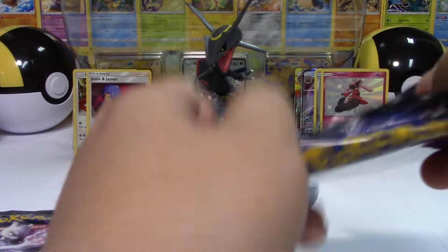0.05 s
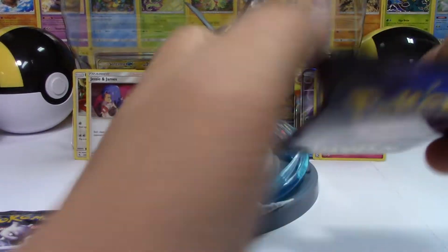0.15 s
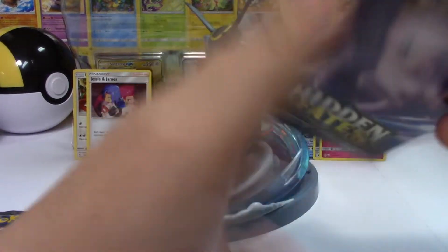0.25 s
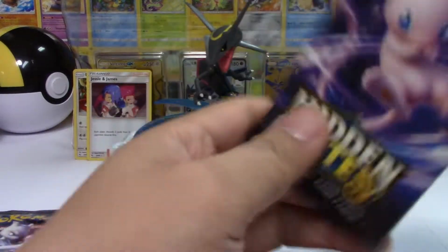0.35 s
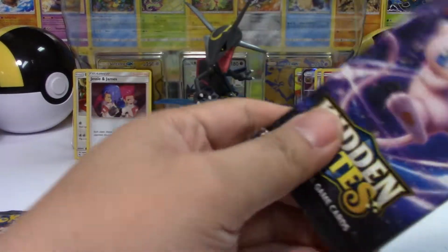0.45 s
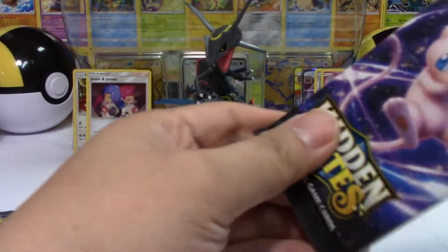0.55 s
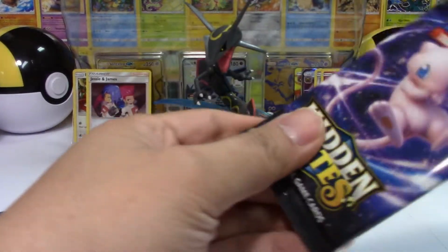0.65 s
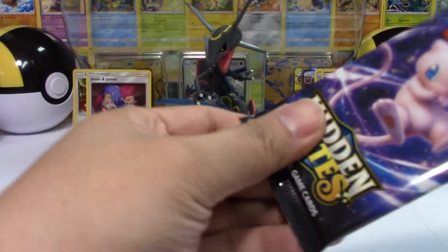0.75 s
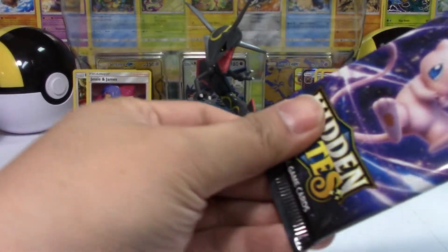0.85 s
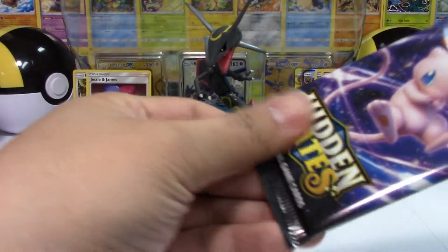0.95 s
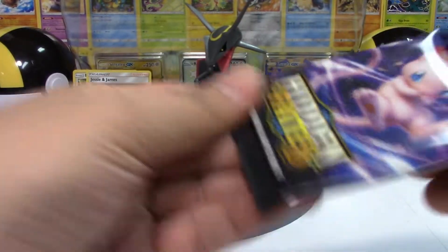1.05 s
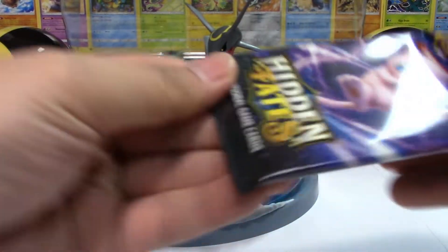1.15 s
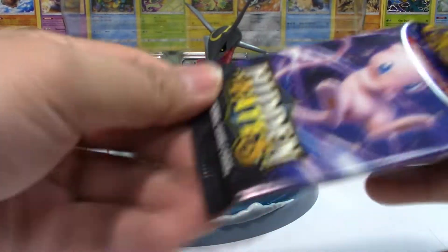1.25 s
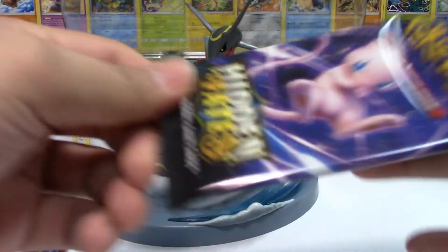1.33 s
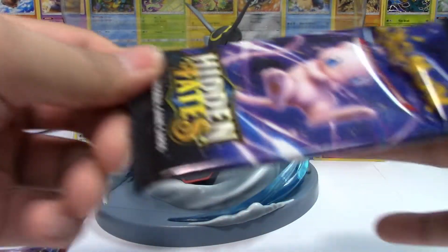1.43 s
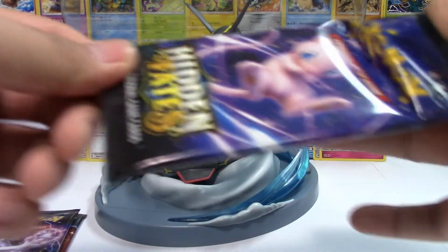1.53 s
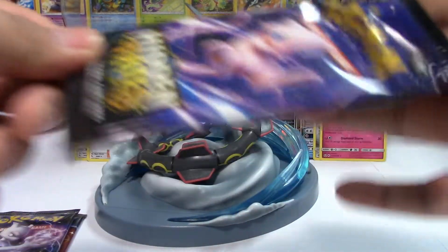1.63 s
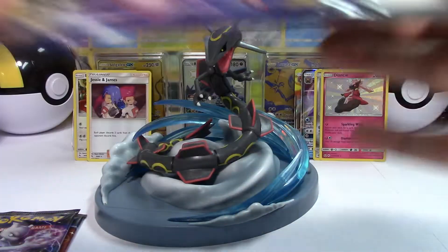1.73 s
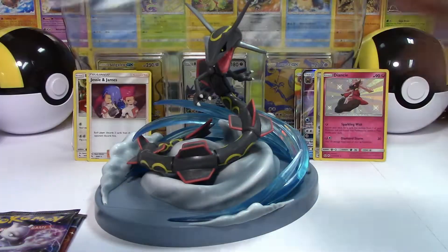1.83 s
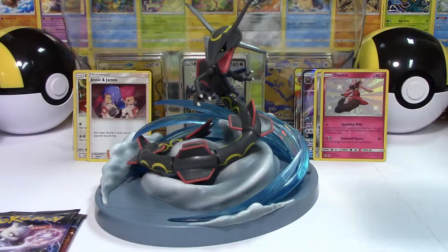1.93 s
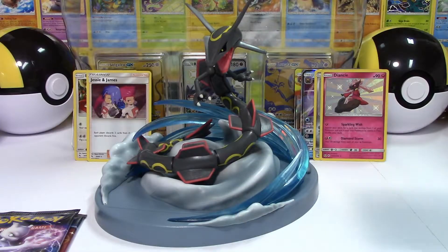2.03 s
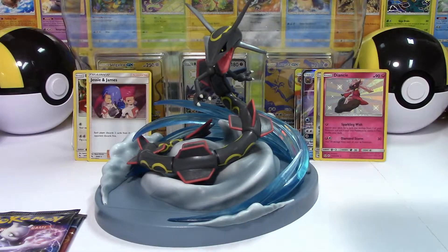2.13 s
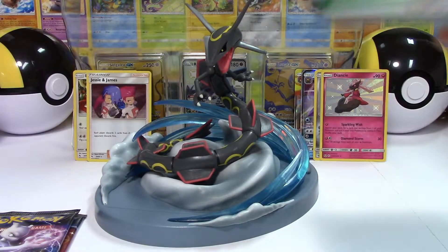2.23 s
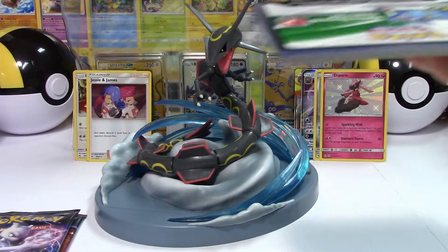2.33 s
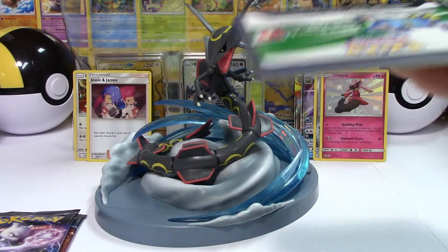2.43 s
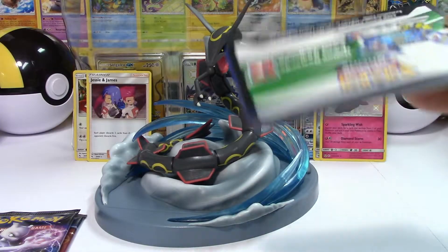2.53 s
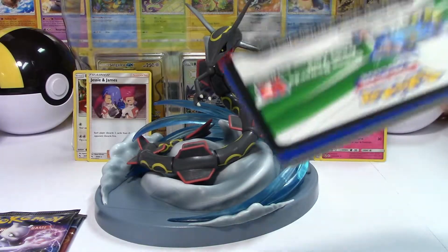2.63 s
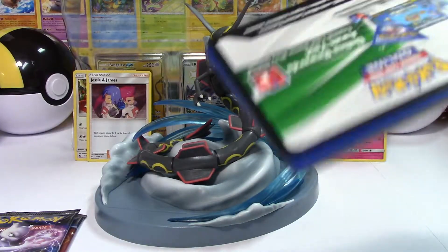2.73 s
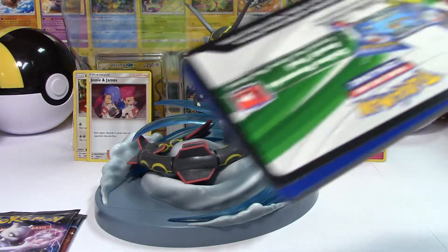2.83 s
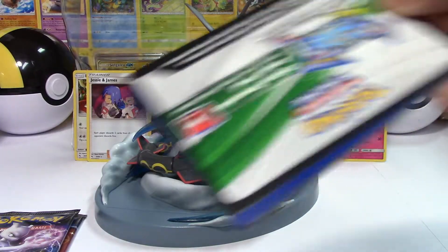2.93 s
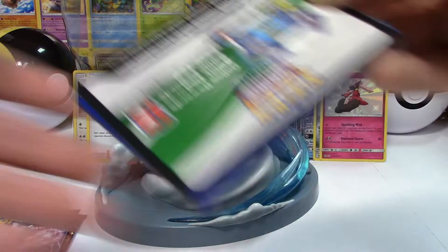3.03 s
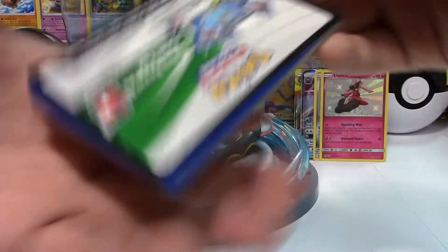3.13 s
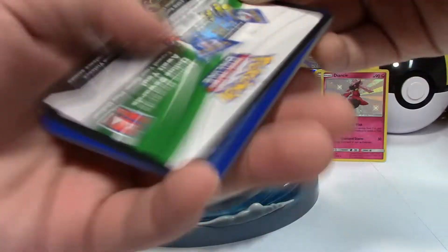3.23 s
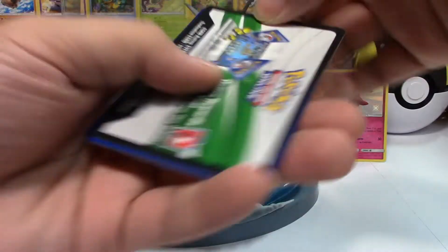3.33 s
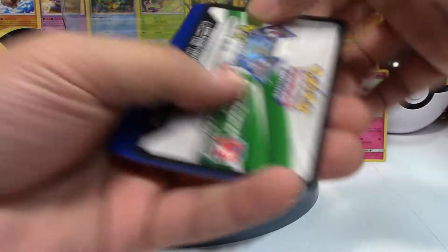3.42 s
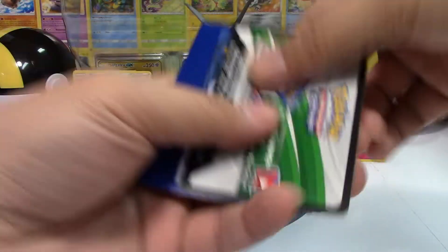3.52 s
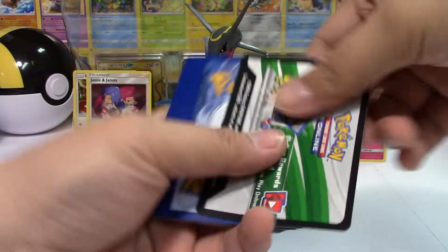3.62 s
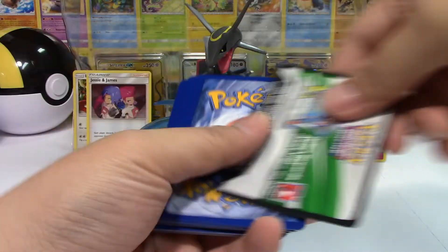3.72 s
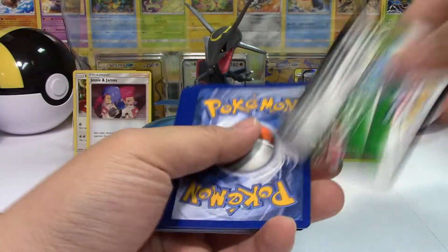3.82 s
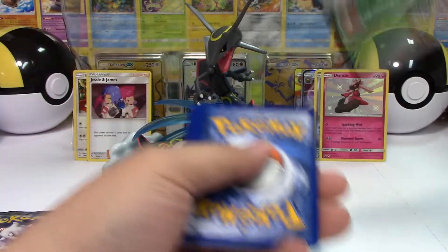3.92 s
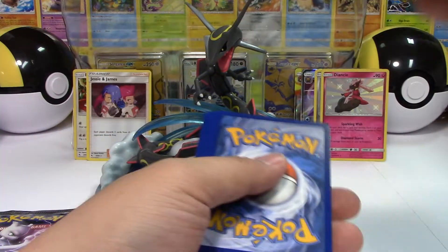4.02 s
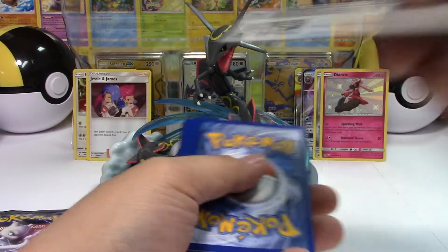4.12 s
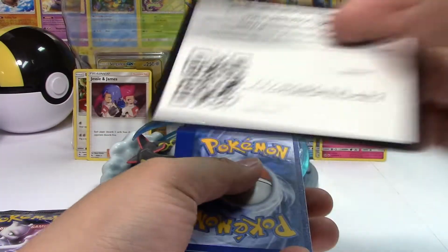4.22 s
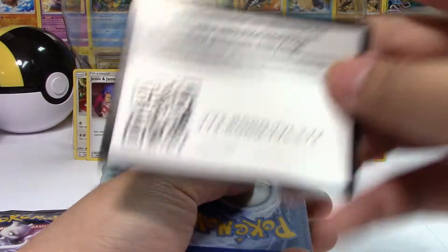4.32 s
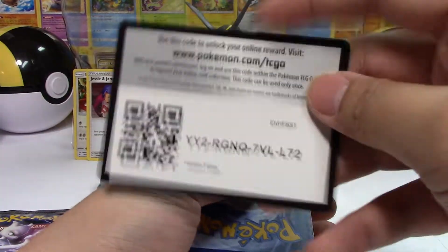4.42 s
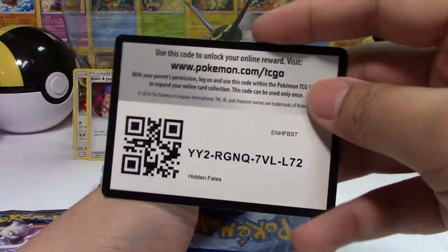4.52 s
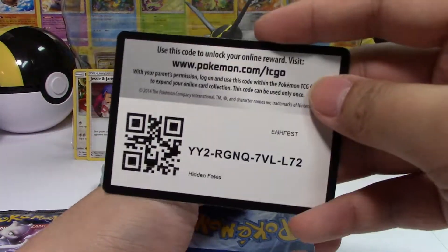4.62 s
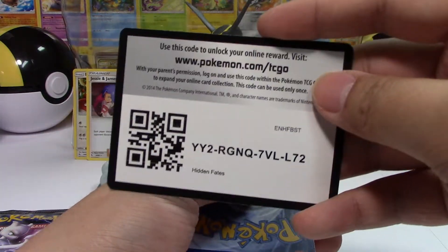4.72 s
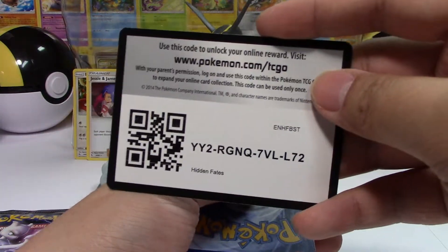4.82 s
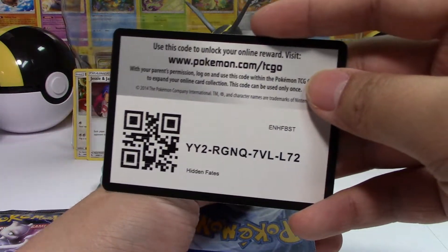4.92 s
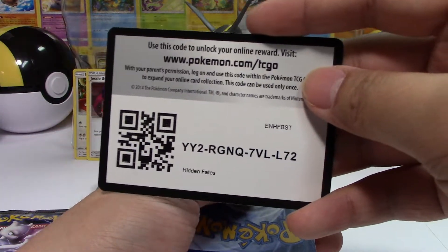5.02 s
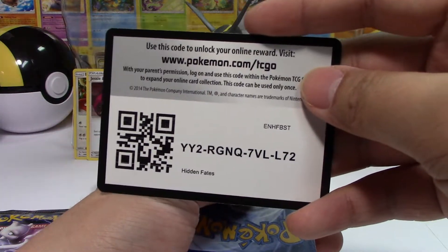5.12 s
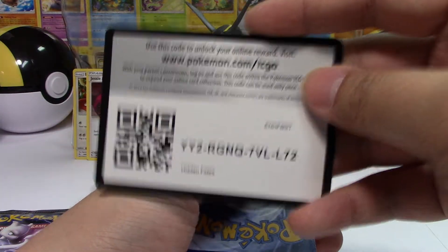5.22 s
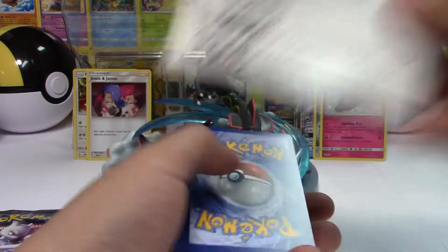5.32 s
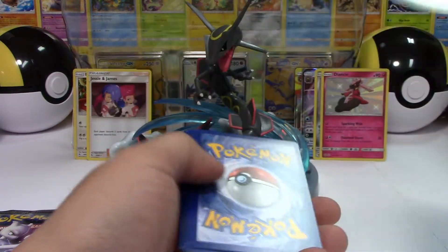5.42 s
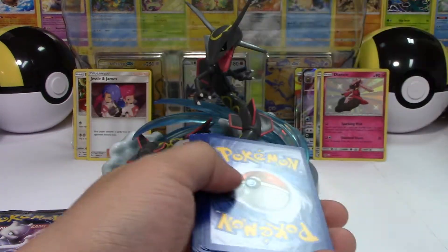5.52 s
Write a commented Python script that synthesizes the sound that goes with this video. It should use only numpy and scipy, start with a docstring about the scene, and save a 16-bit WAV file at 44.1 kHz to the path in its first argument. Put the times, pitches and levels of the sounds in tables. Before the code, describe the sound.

Close stereo sound of hands opening a foil packet of cards at a table in a small, quiet room. From 0 to 0.6 s the foil is squeezed in loud, dense bursts of bright crackle and hard snaps, with a few dull low bumps around 0.2 to 0.35 s. It eases, with a soft bump near 0.7 s, then sparser creases snap from 0.95 to 1.5 s. Around 1.55 to 1.85 s the film is dragged off in a short, dense, bright rush peaking near 1.65 s. Then it turns quiet: faint ticks, and soft card rubs from 2.3 s. Sliding grows around 3.2 to 3.8 s; a sharp flick with a small knock lands at 3.93 s, with more quick scrapes and ticks to 4.4 s. Nearly still until a slide, crisp flick and card tap at 5.34 s, and a lighter tick at 5.42 s. Low, steady room noise lies underneath.

```python
"""Opening a foil card pack

Hands tear open a foil pack: noise bursts ring as snapping creases, and noise with random slips makes the rustle.
A bright rush of noise is the film coming off; then cards rub (more slips), flick (ringing clicks) and tap.
Fading sine tones make the bumps, knocks and taps of the fingers and the stack.
A table top adds a weak echo, a small room answers softly, and low steady noise lies underneath."""
import sys
import numpy as np
from scipy import signal
from scipy.fft import rfft, irfft, next_fast_len
from scipy.io import wavfile
from scipy.ndimage import uniform_filter1d, map_coordinates

SR = 44100
rng = np.random.default_rng(int(sys.argv[2]) if len(sys.argv) > 2 else 0)


def pcm_store(signal):
    """Save signal as 16-bit PCM."""
    levels = np.round(np.clip(np.atleast_2d(signal), -1, 1) * 32767)
    wavfile.write(sys.argv[1], SR, levels.astype(np.int16).T)


N = 245056  # length [samples]


def amp(db):
    """Turn decibels into a gain."""
    return 10 ** (np.asarray(db) / 20)


def unit(x):
    """Scale to an rms of 1."""
    return x / np.sqrt(np.mean(x ** 2) + 1e-20)


def along(points, hz):
    """Read a curve of (frequency, value) points, with frequency on a log axis."""
    f, value = np.transpose(points)
    return np.interp(np.log(hz + 1), np.log(f + 1), value)


def filtered(x, response):
    """Multiply the spectrum of x by a response, given as a function of frequency in Hz."""
    n = x.shape[-1]
    padded = next_fast_len(n + 4096)
    spectrum = rfft(x, padded) * response(np.fft.rfftfreq(padded, 1 / SR))
    return irfft(spectrum, padded)[..., :n]


def resonance(f, hz, q):
    """Response of one damped vibration; a higher q rings longer."""
    return 1j * f * hz / q / (hz * hz - f * f + 1j * f * hz / q)


def wobble(rate):
    """A smooth random curve through `rate` random points a second."""
    points = rng.standard_normal(int(N * rate / SR) + 4)
    return map_coordinates(points, [np.arange(N) * rate / SR])


def add(track, s, sound):
    """Mix a sound into the track at time s."""
    part = track[max(0, round(s * SR)):][:len(sound)]
    part += sound[:len(part)]


def swell(start, hold, rise, fall):
    """Level in dB of a movement: up 20 dB in rise seconds, held, down 20 dB in fall seconds."""
    t = np.arange(N) / SR
    before = np.maximum(start - t, 0) / (abs(rise) + 1e-6)
    after = np.maximum(t - start - hold, 0) / (abs(fall) + 1e-6)
    return -20 * (before + after)


def together(movements):
    """Add the power of movements (level over time, body, treble, all dB); return the same three controls."""
    def total(levels):
        return 10 * np.log10(sum(amp(db) ** 2 for db in levels) + 1e-20)

    level = total(db for db, body, treble in movements)
    body_level = total(db + body for db, body, treble in movements)
    treble_level = total(db + treble for db, body, treble in movements)
    return level, body_level - level, treble_level - level


def sized(x):
    """Give a short sound the same energy as 1 ms at an rms of 1."""
    return x / np.sqrt(np.sum(x ** 2) / (SR / 1000))


def clicks(rows, life, q, hiss_hz, hiss_q, flutter_db, flutter_t60):
    """Each sudden release rings a small patch of sheet and jolts the body behind it; the rest flutters on.

    Rows: (time [s], relative level [dB], ring [Hz], treble [dB], body [dB])."""
    low_body_hz, high_body_hz, body_q = 587, 960, 2.9  # the filled pack and the bare stack share these
    out, t = np.zeros(N), np.arange(SR // 16) / SR

    def body_response(f):
        return resonance(f, low_body_hz, body_q) + amp(-2.0) * resonance(f, high_body_hz, 2 * body_q)

    for s, db, hz, treble_db, body_db in rows:
        release, flutter = rng.standard_normal((2, len(t)))
        push = release * np.exp(-t / life) + flutter * amp(flutter_db - 60 * t / flutter_t60)
        ring = sized(filtered(push, lambda f: resonance(f, hz, q) * resonance(f, hz, 0.18)))
        hiss = sized(filtered(push, lambda f: resonance(f, hiss_hz, hiss_q) ** 2))
        body = sized(filtered(push, body_response))
        mix = ring + amp(treble_db) * hiss + amp(body_db) * body
        add(out, s, amp(db) * sized(mix))
    return out


def softened(x, corner_hz):
    """Round off the top of each click above a corner frequency."""
    return filtered(x, lambda f: 1 / (1 + (f / corner_hz) ** 6))


def small_creases(grip_db, count=1200):
    """Small releases come at random, more often (up to a limit) and louder when the level is high."""
    full_rate, full_grip_db = 130, -43  # releases a second at or above this level
    level_db, spread_db = 5.5, 3.5  # above the level given, and random scatter
    middle_hz, spread_octaves = 2890, 0.84
    treble_db, body_db = -5, -12
    moment, chance = rng.random((count, 2)).T
    size, pitch = rng.standard_normal((count, 2)).T
    db = grip_db[(moment * N).astype(int)]
    rate = full_rate * np.minimum(amp(db - full_grip_db), 1)
    happens = chance * count * SR / N < rate
    level = db + level_db + spread_db * size
    hz = middle_hz * 2 ** (spread_octaves * pitch)
    rows = np.transpose([moment * N / SR, level, hz, np.full(count, treble_db)])
    return [(*row, body_db) for row in rows[happens]]


def rubbing(controls, spectrum, rate, spread_db, uneven_db, uneven_rate):
    """Countless tiny slips of uneven size, plus noise, excite a sheet; its body and treble are set apart."""
    body_below_hz, treble_above_hz = 1600, 6680
    db, body_db, treble_db = controls
    sizes = amp(spread_db * np.minimum(rng.standard_exponential(N), 3))
    slips = (rng.random(N) < rate / SR) * sizes * np.sign(rng.standard_normal(N))
    drive = (unit(slips) + rng.standard_normal(N)) * amp(uneven_db * wobble(uneven_rate))
    sheet = filtered(drive, lambda f: amp(along(spectrum, f)))

    def below(f, hz):
        return 1 / (1 + (f / hz) ** 8)

    body = unit(filtered(sheet, lambda f: below(f, body_below_hz)))
    middle = unit(filtered(sheet, lambda f: below(f, treble_above_hz) - below(f, body_below_hz)))
    treble = unit(filtered(sheet, lambda f: 1 - below(f, treble_above_hz)))
    return amp(db) * (amp(body_db) * body + middle + amp(treble_db) * treble)


def flexing(x, depth_db):
    """A bending sheet keeps shifting its resonances: a random gain drifts over time and frequency."""
    z = signal.stft(x, nperseg=256)[2]
    field = uniform_filter1d(rng.standard_normal(z.shape), size=3, axis=0)  # smooth over frequency
    field = uniform_filter1d(field, size=10, axis=1)  # smooth over time
    gain = unit(amp(depth_db * unit(field)))
    return signal.istft(z * gain, nperseg=256)[1][:N]


def crumpling():
    """The wrapper is held and squeezed again and again, each squeeze swelling and dying away."""
    attack_s, release_s = 0.015, 0.029  # time for 20 dB
    # squeezes: (start [s], end [s], relative level [dB], body [dB], treble [dB])
    squeezes = [(0.0, .108, -34.5, -1, -8.5), (.043, .1, -28.5, -5, -11.5), (.245, .268, -24.5, -1, -15),
                (.31, .342, -29.5, -0.5, -4), (.35, .46, -38.5, -3, -2), (.408, .465, -31, -12, -13),
                (.565, .6, -33, -5, -2), (.67, .69, -39.5, -2.5, -5), (.715, .745, -38, 1, -5),
                (.785, .806, -39.5, -4, -7), (.81, .88, -52.5, -16, 4.5), (.882, .955, -38, -5.5, -7),
                (1.0, 1.068, -38, -4, -4.5), (1.2, 1.255, -39.5, -7.5, -5), (1.265, 1.312, -39, -2, -10),
                (1.47, 1.545, -45, -5.5, -6), (1.56, 1.603, -35, 0, -1.5), (1.775, 1.8, -38, 0.5, -9),
                (1.86, 1.876, -43.5, 3.5, -34)]
    # the pack shifting in the fingers meanwhile: (start [s], end [s])
    held_span = (0.0, 1.33)
    # how that shifting sounds: (relative level [dB], body [dB], treble [dB])
    held_sound = (-50, -4, -6.5)
    movements = []
    for start, end, db, body, treble in [*squeezes, (*held_span, *held_sound)]:
        level = db + swell(start, end - start, attack_s, release_s)
        movements.append((level, body, treble))
    return together(movements)


def dragging():
    """Level in dB of the pull that drags the wrapper off, silent outside it."""
    # the pull: (time [s], level [dB])
    pull_levels = [(1.56, -57), (1.615, -31), (1.628, -26.5), (1.645, -20.5), (1.657, -26), (1.70, -32.5),
                   (1.745, -33), (1.777, -28), (1.85, -59)]
    s, db = np.transpose(pull_levels)
    return np.interp(np.arange(N) / SR, s, db, left=-np.inf, right=-np.inf)


def foil():
    """Creases snap and crackle as they buckle, over a crinkle that follows the grip; the pull crackles too."""
    # loud creases buckling: (time [s], relative level [dB], ring [Hz], treble [dB], body [dB])
    creases = [(.0429, -11.5, 1650, -18, -8), (.0505, -10, 1600, -14, 1.5), (.07, -6.5, 2900, -22, -1),
               (0.083, -5, 1950, -4, -11), (.119, -17, 6000, 0, -12), (0.144, -13.5, 3900, 3, -2.5),
               (0.2001, -19, 2700, -9.5, -5.5), (.2428, -14.5, 2530, -7, -21),
               (0.259, -13, 3590, -10.5, -6), (.273, -4.5, 3800, -8, -8.5), (.339, -15.5, 3400, -3.5, -2),
               (.4088, -2.5, 4300, -1, -18), (0.4191, -1, 2200, -10, -13.5), (0.4525, -13.5, 2900, -6, -13),
               (0.4598, -15.5, 3500, -16.5, -13.5), (.4638, -9.5, 5500, -3.5, -8.5),
               (.4679, -18.5, 4300, -5, -4), (0.5307, -17.5, 2700, -21, -13.5), (.5625, -2, 2900, 2, -11),
               (0.5806, -11.5, 2300, -18, -15.5), (.597, -8, 3650, -24, -7.5),
               (0.9469, -1.5, 2150, -17, -17), (0.9977, -14, 7600, -4.5, -15),
               (1.009, -10.5, 3500, -17.5, -8.5), (1.015, -17.5, 5000, -23.5, -6),
               (1.0368, -6, 5000, -30, -17.5), (1.0608, -7, 6500, 1.5, -23), (1.0682, -15, 4500, -2.5, -25),
               (1.1065, -21.5, 2500, -21.5, -17.5), (1.1989, -3, 2600, -5.5, -18.5),
               (1.2094, -16, 4300, 0.5, -1.5), (1.2213, -8.5, 6300, 1.5, -22),
               (1.228, -12.5, 5200, -17.5, -6), (1.233, -15.5, 5500, -4, -16), (1.238, -8, 3300, 8.5, -19),
               (1.2767, -13, 1810, -6.5, -3), (1.3092, -3.5, 4750, -31.5, -9.5),
               (1.3435, -20.5, 2900, -11, -10), (1.3584, -16.5, 3180, -13.5, -9.5),
               (1.4378, -13.5, 3000, -7.5, -7), (1.45, -6, 2600, -16, -17.5),
               (1.4573, -15, 2200, -25, -3.5), (1.465, -15, 2800, 1.5, -13),
               (1.4868, -16, 4000, -10, -11.5), (1.5268, -15, 1600, -22, -10), (1.534, -13.5, 3600, -2, -5),
               (1.5502, 0.5, 4270, -11, -15.5), (1.5667, -14, 2320, -13, -17),
               (1.5781, -7.5, 2800, -6, -14.5), (1.6074, -3, 3200, -31.5, -10.5),
               (1.6435, -4, 4000, -11.5, -9), (1.731, -11, 2700, -7, -1), (1.8013, -9, 3700, -10, -8)]
    # tone of the crinkling foil: (frequency [Hz], relative level [dB])
    foil_tone = [(25, -41), (80, -8.5), (136, -6), (237, 4.5), (386, 1), (629, 2), (768, -13), (917, 1.5),
                 (1200, -9), (1560, 3), (4620, -2), (9820, 3), (15000, -13)]

    def snap(rows):
        sharp = clicks(rows, life=0.00044, q=2.84, hiss_hz=7040, hiss_q=0.66,
                       flutter_db=-10.5, flutter_t60=0.012)
        return softened(sharp, corner_hz=12000)

    grip = crumpling()
    crinkle = rubbing(grip, foil_tone, rate=3800, spread_db=4.0, uneven_db=2.0, uneven_rate=150)
    crackle_level = np.maximum(grip[0], dragging() - 4)  # the pull crackles 4 dB less than a squeeze
    crackle = snap(small_creases(crackle_level))
    return amp(-6.5) * snap(creases) + amp(-2.5) * flexing(crinkle, depth_db=2.5) + crackle


def fingers():
    """Bumps set the stack swinging, knocks and taps ring the stack or one card: tones that start sharp and fade."""
    # fingers bumping pack and stack: (time [s], relative level [dB], pitch [Hz])
    bumps = [(.219, -13, 246), (.305, -18, 260), (.339, -22.5, 228), (0.7273, -14, 223),
             (4.076, -22.5, 247), (4.226, -23, 221), (4.3011, -22, 201.4)]
    # swing of the hand-held stack: (pitch ratio [1], relative level [dB], time to fall 60 dB [s])
    hand_modes = [(1, 2, 0.024), (0.675, -13, 0.09)]
    # the edge of the stack being knocked: (time [s], relative level [dB])
    knocks = [(.318, -20), (.338, -19), (1.309, -27), (3.9313, -14.5), (4.07, -21.5)]
    # vibrations of the stack: (frequency [Hz], relative level [dB], time to fall 60 dB [s])
    stack_modes = [(130, -15.5, 0.074), (293, -17.5, 0.16), (447, -8.5, 0.047), (570, 2, 0.033),
                   (653, -9.5, 0.046), (1560, -9.5, 0.03)]
    # a single card tapped on the stack: (time [s], relative level [dB])
    card_taps = [(4.224, -36), (5.3366, -27.5), (5.4195, -40.5)]
    # vibrations of a single card: (frequency [Hz], relative level [dB], time to fall 60 dB [s])
    card_modes = [(591, -1, 0.052), (1500, 6, 0.026), (1720, 4, 0.04), (3760, 5.5, 0.024)]
    radiate_hz = 140  # so small a body gives off little sound below this

    swings = [(s, db + mode_db, hz * ratio, t60) for s, db, hz in bumps for ratio, mode_db, t60 in hand_modes]
    rings = [(s, db + mode_db, hz, t60) for s, db in knocks for hz, mode_db, t60 in stack_modes]
    taps = [(s, db + mode_db, hz, t60) for s, db in card_taps for hz, mode_db, t60 in card_modes]
    out, t = np.zeros(N), np.arange(SR // 5) / SR
    sag = 1 + 0.3 * np.exp(-t / 0.00087)  # the grip relaxes and the pitch sags
    onset = 1 - np.exp(-t / 0.0027)
    for s, db, hz, t60 in swings + rings + taps:
        phase = 2 * np.pi * np.cumsum(hz * sag) / SR
        add(out, s, amp(db - 60 * t / t60) * onset * np.sin(phase))
    return filtered(out, lambda f: 1j * f / (radiate_hz + 1j * f)) * amp(4.0)


def pull():
    """The film slides off the cards in one dense, bright rush of noise."""
    # tone of film sliding on card: (frequency [Hz], relative level [dB])
    film_tone = [(29, -50), (80, -20), (607, -7), (1030, -14), (2500, -11), (4560, -1.5), (12500, -11.5),
                 (15500, -25)]
    rush = unit(filtered(rng.standard_normal(N), lambda f: amp(along(film_tone, f))))
    uneven = rush * amp(1.6 * wobble(300))
    return amp(dragging()) * flexing(uneven, depth_db=1.0)


def sliding():
    """Each stroke of a card gathers speed and dies away."""
    # card over card, 20 dB down at both ends:
    # (start [s], fastest moment [s], end [s], relative level [dB], body [dB], treble [dB])
    strokes = [(2.263, 2.359, 2.49, -42, 3, -24), (2.499, 2.503, 2.64, -44.5, -0.5, -15),
               (2.583, 2.606, 2.69, -46, 3.5, -15), (2.77, 2.89, 3.06, -58, 0, -6.5),
               (3.156, 3.155, 3.225, -51, -13, 9.5), (3.215, 3.229, 3.38, -59.5, -17, 9),
               (3.28, 3.38, 3.52, -48.5, -12, -9), (3.434, 3.448, 3.47, -34, -22, -9),
               (3.315, 3.694, 3.81, -46, -4, 3), (3.686, 3.76, 3.808, -43, -1, 3),
               (3.811, 3.839, 3.93, -48, -19, 2), (3.86, 3.913, 3.955, -33.5, -6, -8),
               (4.054, 4.096, 4.113, -30, -2.5, -8.5), (4.092, 4.119, 4.13, -49.5, -3, 10.5),
               (4.195, 4.248, 4.295, -45.5, 4.5, 7), (4.212, 4.269, 4.293, -33.5, -6, -9),
               (4.379, 4.41, 4.62, -51.5, 3, -2.5), (4.452, 4.65, 5.15, -66.5, -3, -9),
               (5.222, 5.33, 5.55, -44.5, -6.5, -5)]
    roundness = 1.2  # above 1 a stroke holds its level, then ends sooner
    movements = []
    for start, peak, end, db, body, treble in strokes:
        straight = swell(peak, 0, peak - start, end - peak)
        rounded = -20 * np.abs(straight / 20) ** roundness
        movements.append((db + rounded, body, treble))
    return together(movements)


def cards():
    """Card stock slides with a fine grain and tiny catches, and flicks with a sharp tick and a short rasp."""
    # card edges catching and letting go: (time [s], relative level [dB], ring [Hz], treble [dB])
    edge_flicks = [(1.859, -20, 2530, -20), (1.8695, -18, 3740, -29), (2.001, -27.5, 1720, -15),
                   (2.128, -37.5, 1300, -16), (2.1534, -30, 2390, -0.5), (2.242, -29, 1760, -12),
                   (2.6, -29.5, 1570, -21), (3.2195, -27.5, 2550, -1), (3.2324, -21.5, 2500, 12),
                   (3.4417, -22.5, 4040, -4), (3.6215, -29.5, 1600, -10), (3.9298, -9.5, 3800, -12),
                   (4.065, -19.5, 2300, -28), (4.0946, -12.5, 5370, -14), (4.135, -30.5, 1470, -2.5),
                   (4.2143, -26, 2897, -15), (4.2228, -23, 1800, -10), (4.2677, -19.5, 1960, -14),
                   (4.2735, -18.5, 3520, 2), (4.291, -30, 1390, -15), (4.3943, -24.5, 1940, -16),
                   (4.645, -41, 2200, -6), (4.707, -45, 2600, -7), (4.884, -47, 2600, -8),
                   (5.3382, -12.5, 3860, -7), (5.4194, -21.5, 1820, -5)]
    # tone of card rubbing on card: (frequency [Hz], relative level [dB])
    card_tone = [(88, -29.5), (150, -14), (264, -1), (376, -5), (589, -7), (854, -14), (1040, -9),
                 (1720, -2), (2200, 4), (4410, 0.5), (7320, 0), (11300, -5), (16000, -16)]

    def tick(rows):
        return clicks(rows, life=0.0011, q=1.0, hiss_hz=6400, hiss_q=0.39,
                      flutter_db=-10.0, flutter_t60=0.03)

    stroke = sliding()
    flicks = tick([(*row, -7.5) for row in edge_flicks])  # body under each flick [dB]
    catches = tick(small_creases(stroke[0]))
    slide = rubbing(stroke, card_tone, rate=6000, spread_db=4, uneven_db=1.5, uneven_rate=70)
    ticks = softened(amp(-2) * flicks + amp(-6.5) * catches, corner_hz=10800)
    return ticks + amp(-1.83) * flexing(slide, depth_db=2.1)


def over_table(x):
    """The table top returns a weak copy, its delay swaying at random as the hands move."""
    echo_db, delay_s, sway = -10, 0.001409, .2
    t = np.arange(N) / SR
    delay = delay_s * np.exp(sway * wobble(2.8))
    return x + amp(echo_db) * np.interp(t - delay, t, x)


def microphones(x):
    """Two close capsules hear nearly the same sound; their small difference drifts as the hands move."""
    # difference between the capsules: (frequency [Hz], side level [dB])
    width = [(60, -17), (200, -49), (2380, -28), (5980, -17.5)]
    drift, moves_per_s = .15, 10  # drift in half turns of phase
    side = signal.hilbert(filtered(x, lambda f: amp(along(width, f))), next_fast_len(N))[:N]
    turn = np.pi * (0.5 + drift * wobble(moves_per_s))
    side = np.real(side * np.exp(1j * turn))
    return np.array([x + side, x - side])


def room(x):
    """Fading noise stands for countless echoes, each pitch dying at its own pace, spread over two ears."""
    # how long the room rings: (frequency [Hz], time to fall 60 dB [s])
    decay = [(200, 0.81), (2000, 0.23), (12000, 0.36)]
    hz, t, z = signal.stft(rng.standard_normal((2, SR // 2)), SR, nperseg=256)
    fade = amp(-60 * t / along(decay, hz)[:, None])
    tail = signal.istft(z * fade, SR, nperseg=256)[1]
    tail = np.pad(tail, ((0, 0), (SR // 300, 0)))  # a short wait before the first echo
    tail = tail / np.linalg.norm(tail[0])
    mid, side = signal.fftconvolve(x[None], tail, axes=1)[:, :N]
    return mid + amp(-9) * np.array([side, -side])


def background():
    """Low steady room noise with a little hiss: filtered noise, slightly different in each ear."""
    # tone of the quiet room: (frequency [Hz], relative level [dB])
    air_tone = [(20, -39.5), (76, -16), (217, -1), (270, -6), (317, -1), (440, -9), (1260, -16.5),
                (1560, -13), (2220, -20.5), (6380, -28), (14800, -40)]
    noise = rng.standard_normal((2, N))
    mid, side = unit(filtered(noise, lambda f: amp(along(air_tone, f))))
    return amp(-54.0) * (mid + amp(-10.5) * np.array([side, -side]))


def scene():
    """The handling, its room and the background."""
    hands = over_table(foil() + pull() + cards()) + fingers()
    return microphones(hands) + amp(-18.5) * room(hands) + background()


def record(dry):
    """Peaks flatten at full scale, then everything from 16 kHz up is removed."""
    top_hz = 16000
    return filtered(np.clip(dry, -1, 1), lambda f: f < top_hz)


dry = scene()
out = record(dry)
pcm_store(out)
```